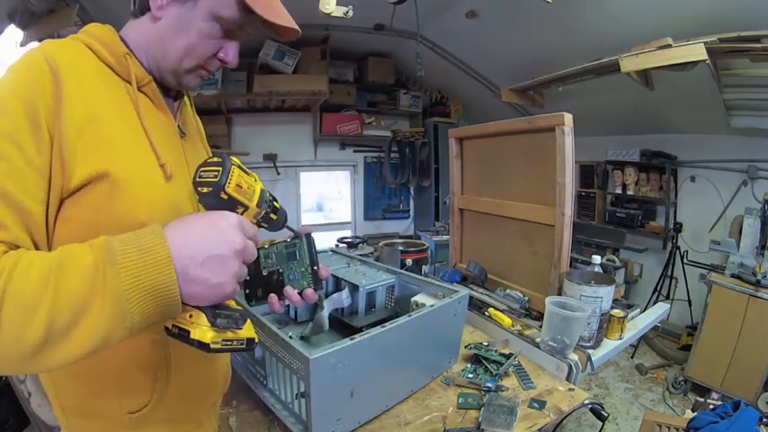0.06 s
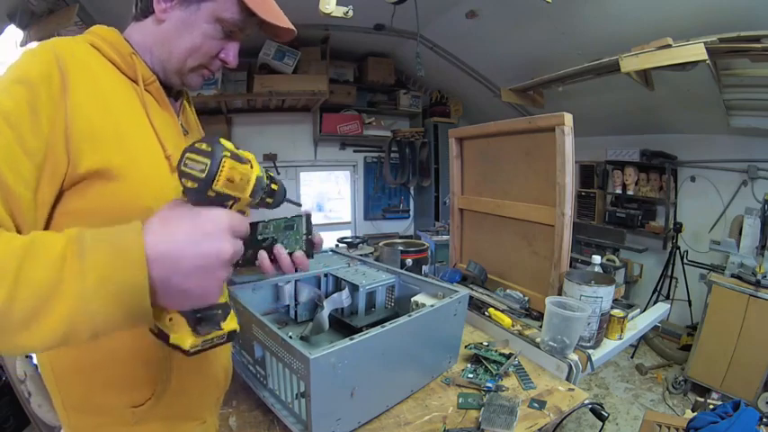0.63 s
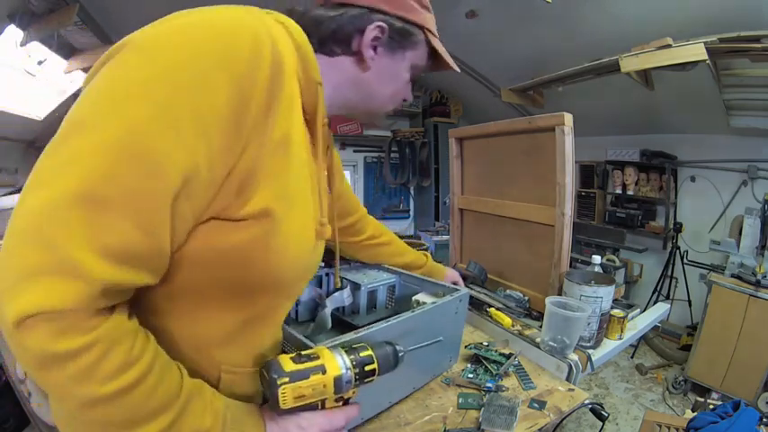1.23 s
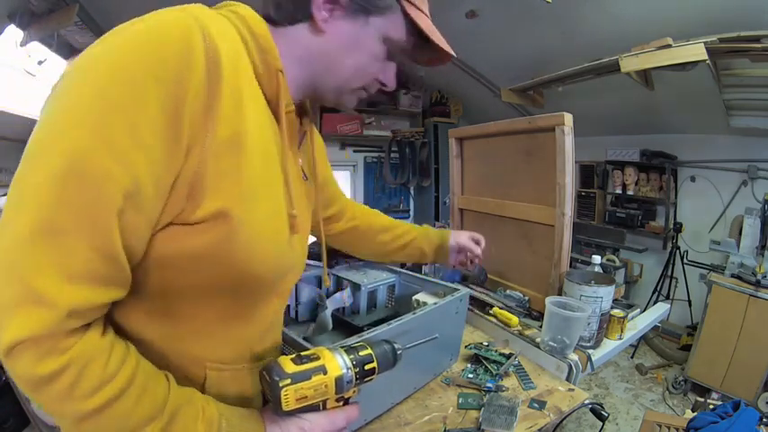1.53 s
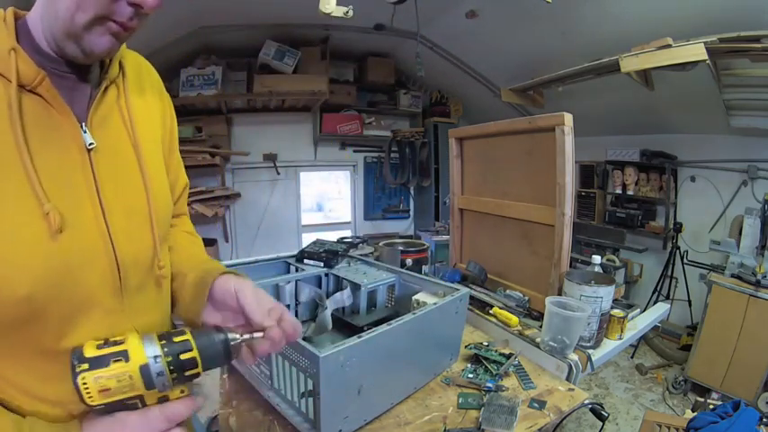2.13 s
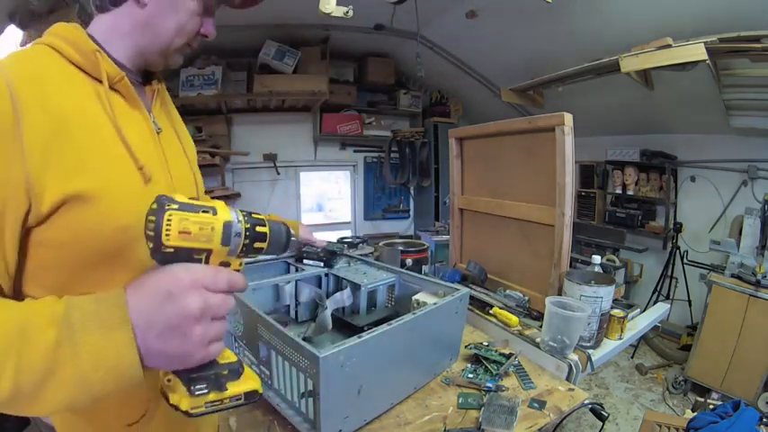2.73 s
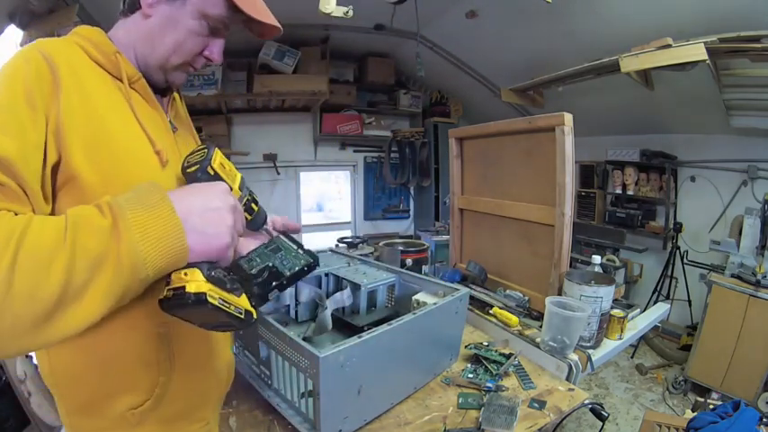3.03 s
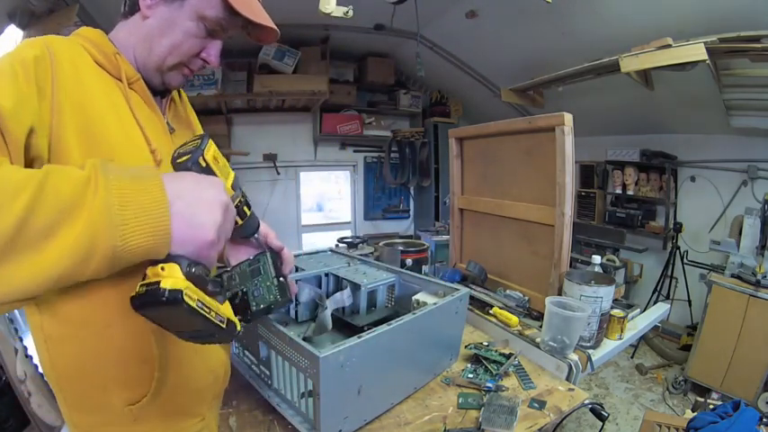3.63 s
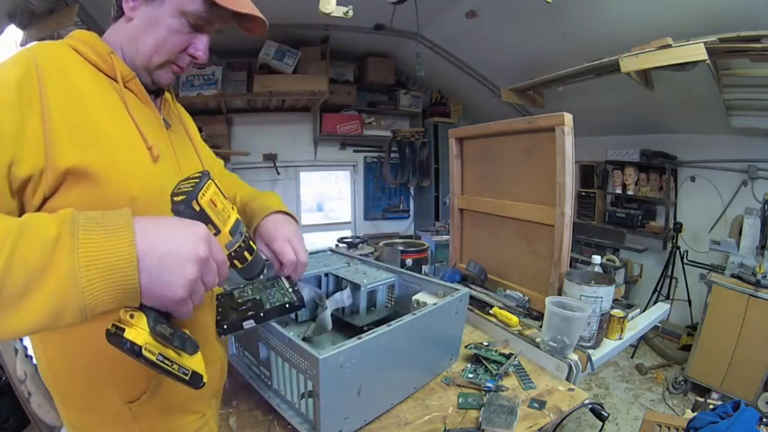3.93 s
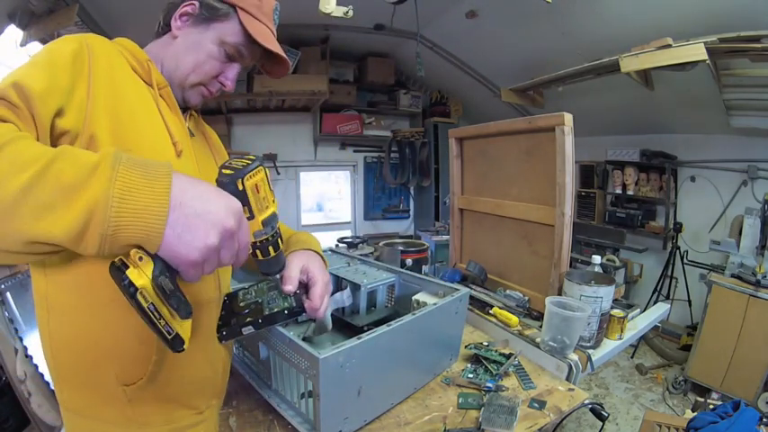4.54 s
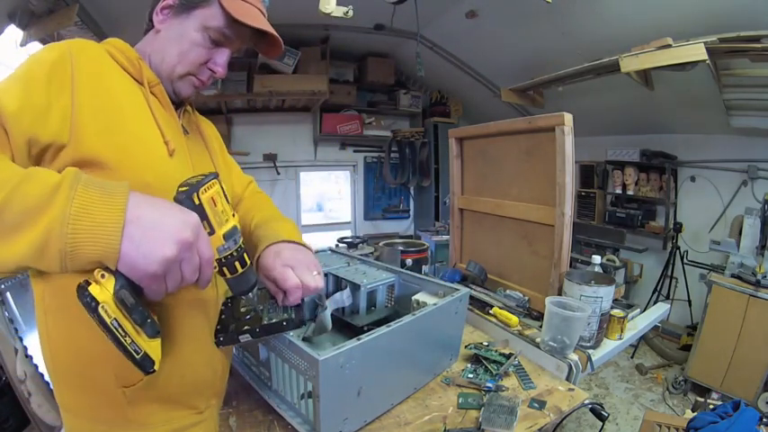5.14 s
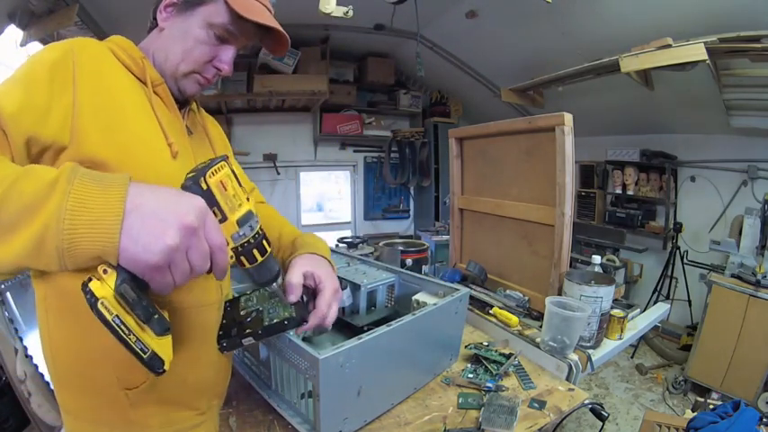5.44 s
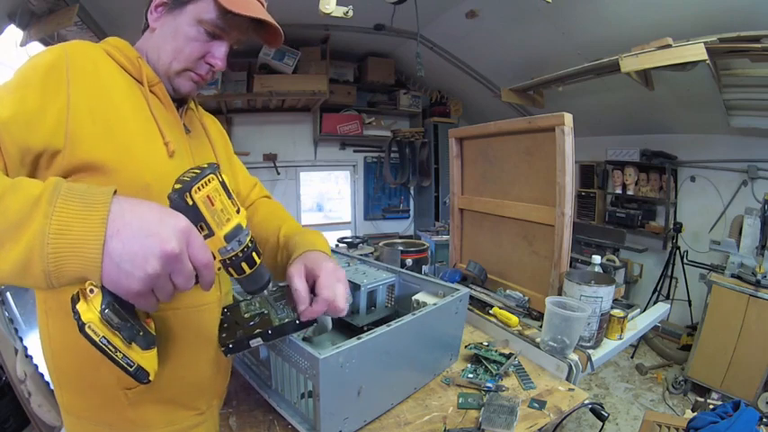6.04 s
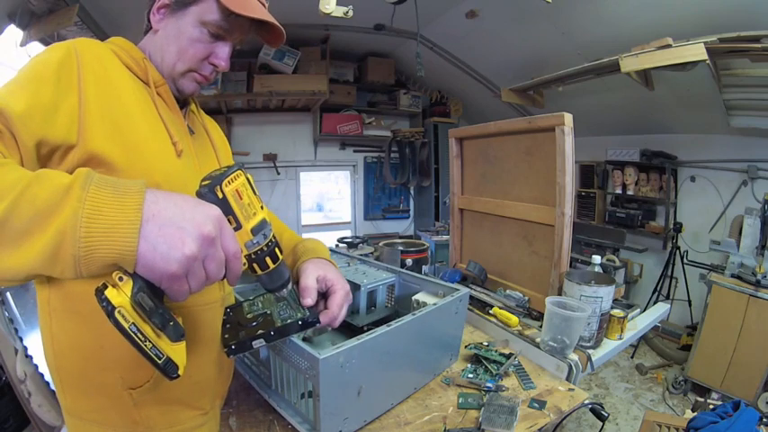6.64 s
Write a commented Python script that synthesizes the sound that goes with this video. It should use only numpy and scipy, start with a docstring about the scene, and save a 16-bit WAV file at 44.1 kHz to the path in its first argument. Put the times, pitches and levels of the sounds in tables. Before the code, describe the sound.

In a small, fairly dry workshop, a cordless drill close by backs screws out of a hard drive with three quick whirs that stop with sharp clacks. Metal parts then clatter into a steel computer case, which booms briefly as a screw hops around. The bit and loose screws click, and hands bump the drive. Three longer whirs follow, evenly spaced, each clacking to a stop, with small taps between them over a faint hum.

```python
"""A cordless drill backs screws out of a hard drive over an open steel computer case in a small workshop.
After a knock, the drill whirs in three quick bursts, each ending in the clack of its spindle lock.
Around 1 s, dropped parts make the case boom and a screw hops about. Then parts knock and slide, hands
bump the drive, and the bit and loose screws tick. From 3.6 s come three longer bursts, a second apart,
and a few last taps. A faint machine hum fills the room throughout."""
import sys
import numpy as np
from scipy import signal
from scipy.fft import rfft, irfft
from scipy.io import wavfile
from scipy.ndimage import uniform_filter1d

SR = 44100
rng = np.random.default_rng(int(sys.argv[2]) if len(sys.argv) > 2 else 0)


def transcribe(u):
    """Save the signal u as a 16-bit wav file named by the first command-line argument.

    u: samples, shape (n,) or (channels, n), limited to [-1, 1]; the rate is SR.
    q: integer samples, one column per channel.
    """
    v = np.clip(np.atleast_2d(u).T, -1, 1)
    q = np.round(v * 32767).astype(np.int16)
    wavfile.write(sys.argv[1], SR, q)


N = 298543
TIME = np.arange(N) / SR
SHORT = 2 ** 14   # samples in one short sound

# trigger pulls: (start [s], lock time [s], speed [share of full], motor level [dB], bit rattle [dB],
# lock's first catch [dB], lock's slam [dB])
PULLS = [(0.309, 0.3716, 1.04, -32.5, -70, 7.5, 8.5), (0.5085, 0.5514, 0.53, -37, -70, -14, -15),
         (0.593, 0.6422, 0.78, -33.5, -76, 13, -17), (3.633, 3.7564, 0.98, -34, -60, 11, 9.5),
         (4.7197, 4.8611, 0.99, -34.5, -52, 9.5, 11.5), (5.7425, 5.857, 1.05, -32.5, -47.5, 3, 14)]
# tone of the motor's brushes and gears, and of the rattling bit: (frequency [Hz], level [dB])
MOTOR_TONE = [(60, -23), (250, -24.5), (550, -21.5), (900, -19), (1250, -10), (2100, -2.5), (3000, -2.5),
              (4500, 0), (5700, 0.5), (7500, -5), (9500, -6.5), (11300, -2.5), (12600, -4), (15500, -4.5)]
RATTLE_TONE = [(60, -16), (250, -15), (520, 2), (850, -4.5), (1150, 5), (1800, -5), (6000, -21)]
def motor(spin_up_s=0.0132, coast_s=0.045, speed_loss=0.08):
    """The motor spins up fast and sags as the trigger is let go; brushes hiss and the bit rattles."""
    noise, tones, t, hz = np.zeros(N), np.zeros(N), TIME[:SHORT], frequencies(SHORT)
    for start, lock, top_speed, db, rattle_db, *_ in PULLS:
        time_left = lock - start - t
        power = np.clip(time_left / coast_s, 0, 1)
        speed = top_speed * (1 - np.exp(-t / spin_up_s)) * (1 - speed_loss * (1 - power))
        running = np.exp(np.minimum(time_left, 0) / 0.0018)
        brushes = rms_one(colour(grains(2.8), curve(MOTOR_TONE, hz)))
        # sparks hiss from the start; the gears' lower noise grows with speed
        sparks = signal.sosfilt(signal.butter(1, 6000, "high", fs=SR, output="sos"), brushes)
        load = np.clip(speed, 0, 1)
        hiss = load * brushes + (1 - load) * 0.41 * sparks
        # the bit rides unevenly in the screw head
        jolts = grains(3.5) * from_db(3.5 * drift(93, SHORT))
        rattle = rms_one(colour(jolts, curve(RATTLE_TONE, hz)))
        add(noise, start, running * (from_db(db) * hiss + from_db(rattle_db) * load * rattle))
        add(tones, start, running * from_db(db) * gear_whine(speed, power))
    echo = signal.fftconvolve(noise, dying_noise(0.12))[:N]   # from the bench and near walls
    return tones + 0.83 * noise + 0.42 * echo


# gear tones: (pitch [multiple of the rate at which teeth meet], level [dB])
GEAR_TONES = [(1, -15), (2, -23), (3, -22), (4, -17), (8, -19), (10, -20), (16, -10)]
def gear_whine(speed, power, teeth_hz=1425):
    """Gear teeth sing higher with speed; the small housing lets out only tones above about 1 kHz."""
    out = np.zeros(SHORT)
    for multiple, db in GEAR_TONES:
        hz = multiple * teeth_hz * speed * (1 + 0.009 * drift(400, SHORT))
        audible = np.clip((hz - 850) / 500, 0, 1) * (hz < CUTOFF_HZ)
        out += from_db(db + 1.9 * drift(153, SHORT)) * audible * sine(hz)
    return out * speed * (1 + power) / 2   # the teeth press less once the trigger is let go


# tone of a clack: (frequency [Hz], level [dB])
CLACK_TONE = [(60, -31), (400, -32), (1000, -24.5), (2100, -13.5), (2700, -5), (4000, -3), (6000, -7),
              (9000, -12), (12000, -10), (15500, -13)]
# where the chuck, which grips the bit, rings: (frequency [Hz], width [Hz], boost [dB])
CHUCK_PEAKS = [(3120, 197, 1.5), (3950, 93, 5.5), (4280, 65, 4.5), (4690, 121.4, 4), (5830, 92, 5.5),
               (6570, 200, 2)]
# the bit jumping in the screw head: (time [s], level [dB])
BIT_SKIPS = [(3.6912, 1), (5.7952, -2)]
def spindle_lock():
    """Loose gears clack together at each start; at each stop the chuck slams into its lock and rings."""
    out, tone, peaks = np.zeros(N), curve(CLACK_TONE, frequencies(SHORT)), resonances(CHUCK_PEAKS)
    clacks = list(BIT_SKIPS)
    for start, lock, *_, catch_db, slam_db in PULLS:
        clacks += [(start, -7), (lock - 0.0077, catch_db), (lock, slam_db)]
        clacks.append((lock + 0.007, slam_db - 8.5))   # the chuck swings back once
    for s, db in clacks:
        for delay, tap_db in ((0, 0), (0.0017, -8)):   # a weaker tap follows as the pins settle
            tap = contact(db + tap_db + tone, peaks, 0.0061, ring_t60=0.089, ring_db=-6.5, linger=1.3)
            add(out, s + delay, tap)
        add(out, s, ring(4058, db - 60, t60=0.17))
    return out


# parts hitting the case: (time [s], level [dB], hardness [dB/octave], weight [dB], extra ringing [dB])
KNOCKS = [(0.0009, -0.5, -1, -0.5, 0), (0.9297, 5, 1.5, 0.5, 3), (0.9739, 7.5, 2.5, 11, -3),
          (1.1451, 8.5, -4.5, 2.5, -1.5), (1.1709, 6.5, -5.5, 4.5, 0.5), (2.0693, -1.5, 2, -11, 4),
          (2.0912, 5, 3.5, -6.5, -5)]
# tone of a knock: (frequency [Hz], level [dB])
KNOCK_TONE = [(80, -45), (400, -9.5), (750, -12), (1200, -5), (2400, 0), (5200, -8), (7000, -10),
              (11000, -12.5), (15500, -17.5)]
# where the parts ring: (frequency [Hz], width [Hz], boost [dB])
PART_PEAKS = [(1100, 110, 4), (1600, 130, 4), (2020, 140, 5), (2320, 90, 3), (2600, 130, 4), (3060, 100, 3),
              (3500, 150, 3), (6610, 230, 2), (7800, 400, 5)]
def knocks():
    """Metal parts drop into the case and knock against it."""
    return touches(KNOCKS, KNOCK_TONE, PART_PEAKS, crack_t60=0.024, ring_t60=0.11, ring_db=3.5)


# blows that shake the case and bench: (time [s], level [dB])
THUDS = [(0.976, -64.5), (1.1455, -54), (1.1709, -59.5)]
# the notes they boom at: (frequency [Hz], level [dB], fade time [s])
CASE_NOTES = [(74.6, 2, 0.68), (119.6, -1.5, 0.48), (159, -2, 0.27), (170, 8, 0.2), (199, -3.5, 0.3),
              (272, 0, 0.097), (368, -15, 0.22), (512, 6, 0.32), (662, 0.5, 0.29), (1003, -4, 0.96),
              (1040, 1, 0.14)]
# single parts left ringing: (time [s], frequency [Hz], level [dB], fade time [s])
PINGS = [(.002, 2404, -48, 0.5), (.424, 1860, -41.5, 0.13), (0.932, 2810, -31.5, 0.096),
         (1.146, 1960, -21.5, 0.048), (1.226, 495, -45.5, 0.27), (2.0911, 1904, -33, .09),
         (2.699, 431, -47.5, 0.08), (2.801, 242, -50, 0.075), (2.851, 1380, -39, 0.056),
         (5.1343, 3130, -37.5, 0.064)]
def ringing_steel(pitch_gap=0.022):
    """Heavy blows make the case and bench boom; single parts ring with two close notes that waver."""
    out = np.zeros(N)
    for s, db in THUDS:
        for hz, note_db, t60 in CASE_NOTES:
            add(out, s, ring(hz, db + note_db + rng.normal(0, 1), t60))
    for s, hz, db, t60 in PINGS:
        partner_hz = hz * (1 + pitch_gap * rng.choice([-1, 1]) * rng.uniform(0.59, 1.6))
        add(out, s, ring(hz, db - 4.5, t60) + ring(partner_hz, db - 4, t60 / 2))
    return out


# bumps on the drive: (time [s], level [dB], hardness [dB/octave], weight [dB])
BUMPS = [(0.4168, -8, 1.5, -6), (2.7025, -12.5, -0.5, 6), (2.8508, -8, 2.5, 1.5), (3.812, -12.5, 0.5, 6),
         (4.0815, -28.5, 5.5, 9.5), (6.3961, -12, -2, 4)]
# tone of a bump: (frequency [Hz], level [dB])
BUMP_TONE = [(80, -26), (400, -4), (750, -5.5), (1200, -4), (2400, -0.5), (5200, -7), (7000, -9.5),
             (11000, -13), (15500, -18)]
# where the drive rings: (frequency [Hz], width [Hz], boost [dB])
DRIVE_PEAKS = [(455, 66, 8), (800, 52, 3), (1108, 45, 13), (1380, 14, 3.9), (1592, 50, 11.4),
               (2034, 70, 7.2), (3105, 52, 8.4), (4460, 400, 4.7)]
def bumps():
    """Hands and the drill's body bump the drive, which rings briefly."""
    return touches(BUMPS, BUMP_TONE, DRIVE_PEAKS, crack_t60=0.0093, ring_t60=0.092, ring_db=6,
                   variety=0.26)


# taps of the bit: (time [s], level [dB], hardness [dB/octave])
TICKS = [(0.166, -30.5, 5.5), (1.774, -23.5, 1), (1.9343, -23.5, -1), (2.4161, -32.5, 6.5),
         (3.288, -23, -4.5), (3.3351, -17, -13), (3.415, -22.5, -6), (4.2901, -20, 0.5),
         (4.6281, -18, -10.5), (4.6798, -28.5, 5), (5.1333, -10.5, 2.5), (5.6107, -23.5, 5),
         (5.7002, -15, 2), (6.6933, -20, 4.5), (6.7594, -23, -4.5)]
# tone of a tick: (frequency [Hz], level [dB])
TICK_TONE = [(80, -13), (400, -10.5), (750, -9), (1200, -1.5), (2400, 1), (5200, -1), (7000, -4.5),
             (11000, -23), (15500, -24.5)]
# where the bit rings: (frequency [Hz], width [Hz], boost [dB])
BIT_PEAKS = [(2570, 48, 5.3), (3088, 76, 7.7), (4030, 82, 1.4), (5930, 280, 3.1), (6500, 150, 0.84),
             (9900, 900, 1.34)]
def bit_ticks():
    """The bit taps the drive as it feels for a screw head."""
    return touches(TICKS, TICK_TONE, BIT_PEAKS, crack_t60=0.0055, ring_t60=0.1, ring_db=-2.5)


# a screw meeting the bit: (time [s], level [dB], hardness [dB/octave])
CLICKS = [(1.8126, -15.5, -5.5), (1.8291, -12, 1.5), (1.9668, -37, 2.5), (2.5059, -25.5, -5.5),
          (2.5347, -17, 2.5), (5.2322, -31.5, -2.5)]
# tone of a click: (frequency [Hz], level [dB])
CLICK_TONE = [(80, -12), (400, -7), (750, -10), (1200, -5), (2400, 0), (5200, 1.5), (7000, 3),
              (11000, 12.5), (15500, 2)]
def screw_clicks():
    """A loose screw clicks sharply against the steel bit."""
    return touches(CLICKS, CLICK_TONE, BIT_PEAKS, crack_t60=0.003, ring_t60=0.078, ring_db=-6.5)


# hops of a screw: (time [s], level [dB], hardness [dB/octave], strongest note [Hz])
HOPS = [(1.043, -29, -0.5, 13050), (1.2088, -21.5, 0.5, 5900), (1.2752, -22, -2, 5640),
        (1.317, -28.5, 0, 6000), (1.359, -18.5, -2, 12900), (1.457, -26.5, 0, 7300),
        (1.4968, -21, 2.5, 8200), (1.51, -28, -6, 7550)]
# tone of a hop: (frequency [Hz], level [dB])
HOP_TONE = [(80, 1), (400, 2.5), (750, -5), (1200, -6), (2400, -0.5), (5200, -2.5), (7000, -2.5),
            (11000, -0.5), (15500, -10)]
# where the screw rings: (frequency [Hz], width [Hz], boost [dB])
SCREW_PEAKS = [(5700, 350, 6), (7840, 400, 7), (9720, 300, 4), (11400, 200, 3), (12900, 600, 6)]
def hopping_screw(width_hz=660, boost_db=9):
    """A dropped screw tinkles about; each landing brings out one of its notes."""
    return sum(touches([hop], HOP_TONE, SCREW_PEAKS + [(hz, width_hz, boost_db)],
                       crack_t60=0.0047, ring_t60=0.11, ring_db=0.5, variety=0.4)
               for *hop, hz in HOPS)


# sliding strokes: (time [s], length [s], level [dB], brightness [dB/octave])
SLIDES = [(0.426, 0.053, -49, 2.5), (1.0, 0.1, -63.5, 7), (1.183, 0.05, -50.5, 7), (1.347, 0.025, -52.5, 5),
          (1.643, 0.02, -48.5, 6.5), (2.548, 0.028, -53, 8), (2.794, 0.07, -54, 4),
          (3.526, 0.029, -58.5, 4), (3.791, 0.04, -48.5, -1), (4.018, 0.063, -63.5, 1.5),
          (5.636, 0.0088, -56, 2)]
# tone of a slide: (frequency [Hz], level [dB])
SLIDE_TONE = [(60, -1), (350, -2), (700, 5), (1400, 4.5), (4000, 0.5), (8000, -8.5), (15500, -16)]
def slides():
    """Parts rub over the drive in short gritty strokes that catch, slip and ease off."""
    out, t, hz = np.zeros(N), TIME[:SHORT], frequencies(SHORT)
    tone = curve(SLIDE_TONE, hz) + resonances(DRIVE_PEAKS)
    for s, length, db, brightness in SLIDES:
        stroke = np.minimum(t / 0.0041, 1) * from_db(-4 * t / length)
        release = np.exp(np.minimum(length - t, 0) / 0.029)
        slips = grains(3.4) * from_db(2 * drift(300, SHORT))
        grit = colour(slips, tone + brightness * np.log2(hz / 2000).clip(-1, 3))
        add(out, s, from_db(db) * stroke * release * rms_one(grit))
    return out


# faint pops: (time [s])
POP_TIMES = [1.1, 2.603, 3.354, 3.6103, 4.101, 4.359, 5.605, 6.351, 6.61]
# tone of a pop: (frequency [Hz], level [dB])
POP_TONE = [(60, -6), (500, -6), (1500, -12.5), (4000, -24), (15000, -26)]
def pops():
    """Soft, dull clicks that do not ring, all equally loud."""
    out = np.zeros(N)
    click = colour(signal.unit_impulse(SHORT), curve(POP_TONE, frequencies(SHORT)))
    for s in POP_TIMES:
        add(out, s, from_db(-16.5) * click)
    return out


def workshop(x, echo_db=-24, dull_hz=3500):
    """The crowded room adds only a faint, dull echo."""
    tail = signal.sosfilt(signal.butter(1, dull_hz, fs=SR, output="sos"), dying_noise(t60=0.24))
    return x + from_db(echo_db) * signal.fftconvolve(x, tail)[:N]


# tone of the room's hiss, and the notes of the hum: (frequency [Hz], level [dB])
AIR_TONE = [(15, -44.5), (25, -13), (64, -12.5), (96, -12), (281, -7), (433, -13.5), (469, -13.5),
            (509, -13), (826, -14.5), (2060, -18), (2360, -18), (2560, -18.5), (3340, -18.5), (4150, -20),
            (15500, -22.5)]
HUM_NOTES = [(60, -84), (75, -88.5), (275, -87.5), (479, -76), (1917, -84), (2400, -81.5), (2880, -84.5),
             (3359, -89)]
def background(air_db=-65.9):
    """Even hiss and rumble with the slightly wavering hum of a running machine."""
    air = irfft(rfft(rng.standard_normal(N)) * from_db(curve(AIR_TONE, frequencies(N))), N)
    hum = sum(from_db(db) * sine(hz + 1.43 * drift(14, N)) for hz, db in HUM_NOTES)
    return from_db(air_db) * rms_one(air) + hum


def touches(rows, tone, peaks, crack_t60, ring_t60, ring_db, variety=0.098):
    """Touches on one object: harder ones are brighter, heavier ones last longer and have more bass."""
    out, hz = np.zeros(N), frequencies(SHORT)
    treble = np.maximum(np.log2(hz / 2280), 0)   # octaves above 2280 Hz
    bass = curve([(416, 1), (2280, 0)], hz)

    def touch(db, hardness, weight_db=0, extra_ring_db=0):
        """Each touch stirs the object's notes in its own mix."""
        mix = [(centre, width, boost * (1 + variety * rng.uniform(-0.53, 1)))
               for centre, width, boost in peaks]
        tone_db = db + curve(tone, hz) + hardness * treble + weight_db * bass
        stretch = from_db(0.92 * weight_db)
        return contact(tone_db, resonances(mix), crack_t60 * stretch, ring_t60, ring_db + extra_ring_db)
    for s, *blow in rows:
        add(out, s, touch(*blow))
    return out


def contact(tone_db, peaks_db, crack_t60, ring_t60, ring_db, linger=1.13):
    """A hard touch: a brief crack, then ringing in which the object's own notes stand out more."""
    crack = dying_noise(crack_t60)
    tail = (1 - np.exp(-TIME[:SHORT] / 0.00047)) * dying_noise(ring_t60)
    crack = colour(crack, tone_db + flatten(crack) + peaks_db)
    tail = colour(tail, tone_db + flatten(tail) + linger * peaks_db)
    return (crack + from_db(ring_db) * tail) / np.hypot(1, from_db(ring_db))


def flatten(x):
    """The gain in dB that evens out a noise's broad humps and dips."""
    return -10 * np.log10(uniform_filter1d(np.abs(rfft(x)) ** 2, size=350) + 1e-12)


def resonances(peaks):
    """The boost in dB around the frequencies where an object rings."""
    hz = frequencies(SHORT)
    return sum(db / (1 + (2 * (hz - centre) / width) ** 2) for centre, width, db in peaks)


def ring(hz, db, t60):
    """One note that dies away; t60 is its fade time, the seconds it takes to fall by 60 dB."""
    t = TIME[:SR]
    return from_db(db) * np.sin(2 * np.pi * hz * t) * np.exp(-np.log(1000) * t / t60)


def sine(hz):
    """A pure tone that follows a changing pitch."""
    return np.sqrt(2) * np.sin(2 * np.pi * np.cumsum(hz) / SR)


def dying_noise(t60):
    """Noise of energy 1 that falls by 60 dB in t60 seconds."""
    x = rng.standard_normal(SHORT) * np.exp(-np.log(1000) * TIME[:SHORT] / t60)
    return x / np.linalg.norm(x)


def grains(spread_db):
    """Noise made of tiny contacts of uneven strength."""
    return rms_one(rng.standard_normal(SHORT) * from_db(spread_db * drift(2500, SHORT)))


def drift(rate, size):
    """A random wander that heads for a new value `rate` times a second."""
    position = np.arange(size) * rate / SR
    return np.interp(position, np.arange(size // 8), rng.standard_normal(size // 8))


def colour(x, db):
    """Turn each frequency up or down without smearing the sound back in time (minimum phase)."""
    cepstrum = irfft(np.log(from_db(db)), len(x))
    cepstrum[1:len(x) // 2] *= 2
    cepstrum[len(x) // 2 + 1:] = 0
    return irfft(rfft(x) * np.exp(rfft(cepstrum)), len(x))


def curve(points, hz):
    """Join (frequency, level) points with straight lines on a scale of octaves."""
    point_hz, db = np.transpose(points)
    return np.interp(np.log(hz), np.log(point_hz), db)


def frequencies(size):
    """The frequencies in a spectrum of this many samples."""
    return np.maximum(np.fft.rfftfreq(size, 1 / SR), 1)


def from_db(db):
    """Decibels to gain."""
    return 10 ** (np.asarray(db) / 20)


def rms_one(x):
    """Scale to an average (rms) level of 1."""
    return x / np.sqrt(np.mean(x ** 2) + 1e-20)


def add(out, s, sound):
    """Mix a sound in from time s on."""
    i = max(0, round(s * SR))
    out[i:i + len(sound)] += sound[:max(0, N - i)]


def scene():
    """Drill, parts and case in the room, on one channel."""
    handling = knocks() + bumps() + bit_ticks() + screw_clicks() + hopping_screw() + slides()
    drill = motor() + spindle_lock()
    return (workshop(drill + handling) + ringing_steel() + pops() + background())[None]


CUTOFF_HZ = 15900
def record(dry):
    """The very highest treble is cut off steeply."""
    return signal.sosfilt(signal.ellip(12, .1, 70, CUTOFF_HZ, fs=SR, output="sos"), dry)


dry = scene()
out = record(dry)
transcribe(out)
```